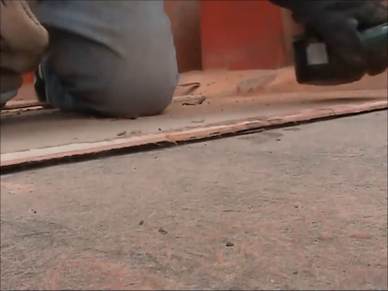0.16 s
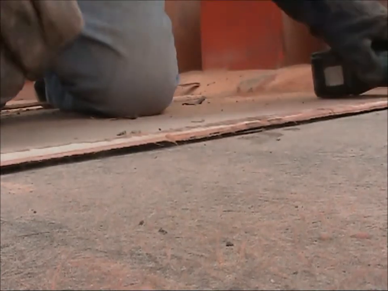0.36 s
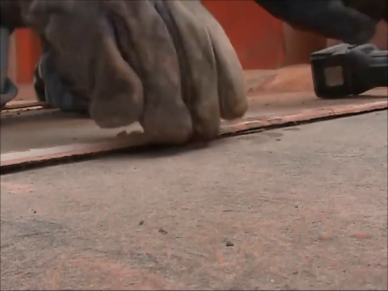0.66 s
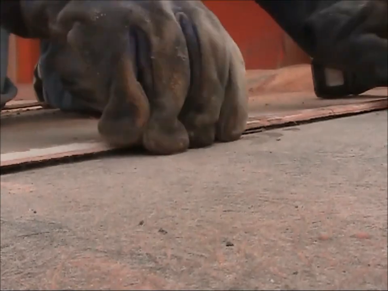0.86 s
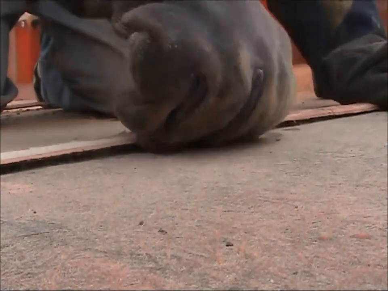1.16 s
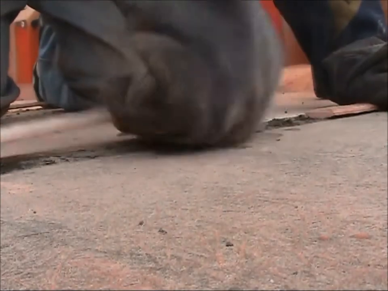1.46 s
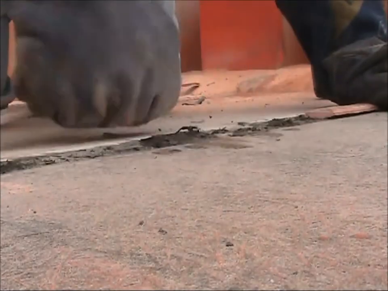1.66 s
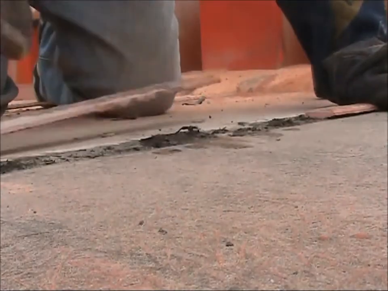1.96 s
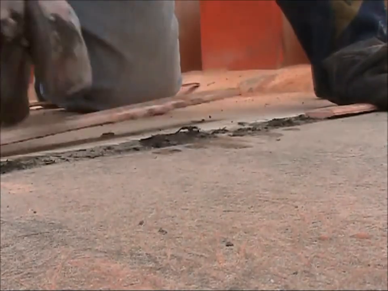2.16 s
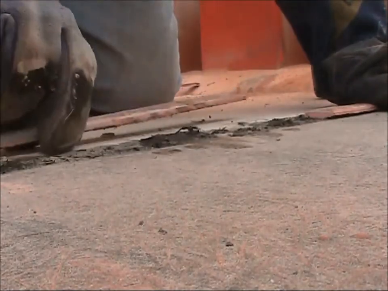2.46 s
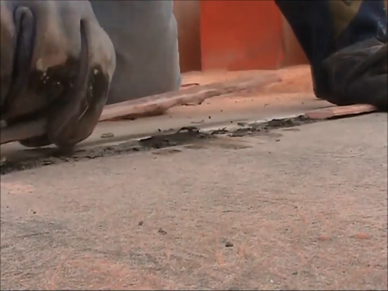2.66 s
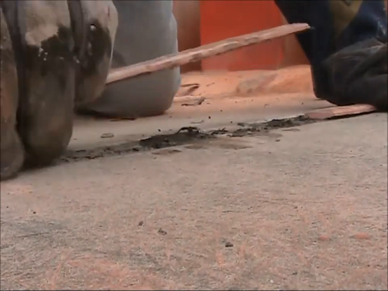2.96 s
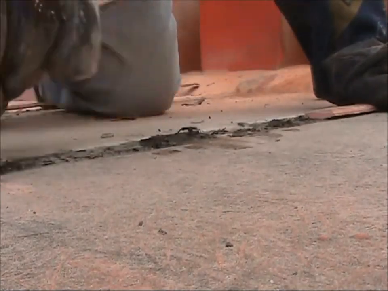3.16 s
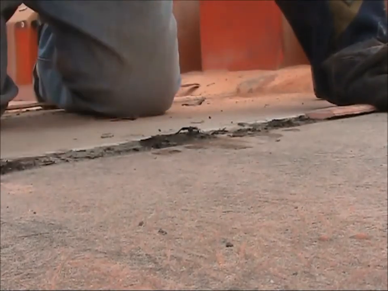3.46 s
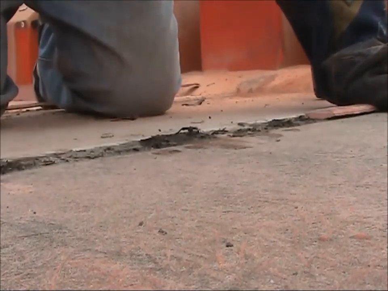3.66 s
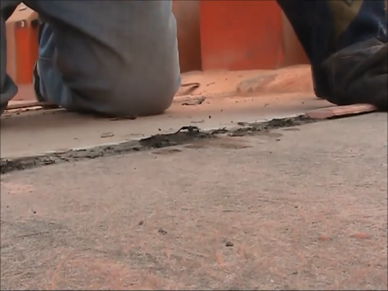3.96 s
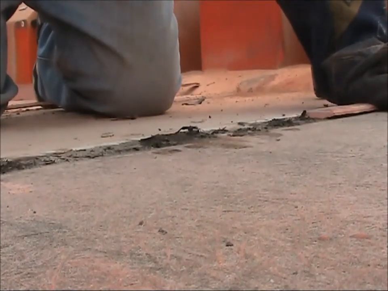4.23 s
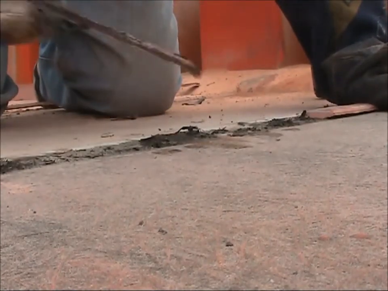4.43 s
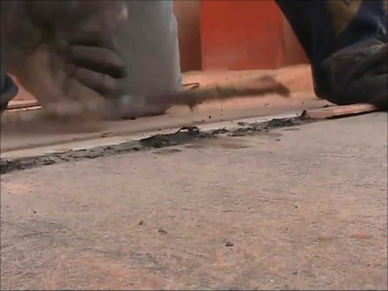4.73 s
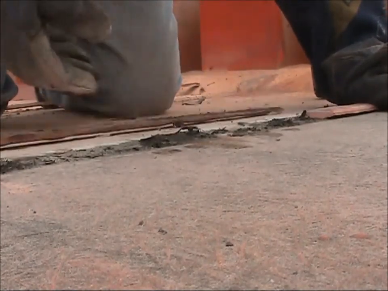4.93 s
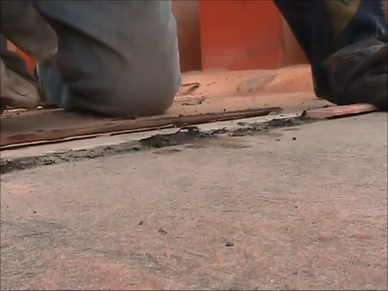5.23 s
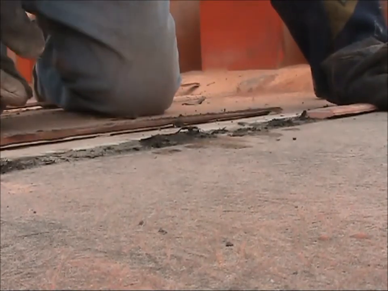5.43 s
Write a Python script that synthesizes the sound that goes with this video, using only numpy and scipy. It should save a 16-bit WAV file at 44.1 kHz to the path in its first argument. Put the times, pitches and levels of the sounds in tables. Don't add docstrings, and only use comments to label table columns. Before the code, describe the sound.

Close boat-deck work outdoors: heavy tool thump, sharp crack of a strip prised free, gritty scraping rattle, then a hard double drop.

```python
import sys
import numpy as np
from scipy import signal
from scipy.fft import rfft, irfft, next_fast_len
from scipy.io import wavfile
from scipy.ndimage import uniform_filter1d

SR = 44100
rng = np.random.default_rng(int(sys.argv[2]) if len(sys.argv) > 2 else 0)


def output_pcm(signal):
    pcm = np.clip(np.atleast_2d(signal).T, -1, 1) * 32767
    wavfile.write(sys.argv[1], SR, np.round(pcm).astype(np.int16))


def gain_from_decibels(decibels):
    exponent = np.asarray(decibels, float) / 20
    return 10 ** exponent


N = 246519
PAD = SR // 4

# pitch in Hz, width in Hz, level in dB.
STRIP_MODES = [(930, 290, -47), (1236, 123, 3.5), (1670, 400, -6), (2115, 310, 2.5), (3360, 640, -9.5),
               (4110, 130, 1), (5600, 2250, -7), (6930, 1660, 3.5), (9320, 1070, 0)]


def unit(x):
    return x / np.sqrt(np.mean(x ** 2) + 1e-20)


def along(points, hz):
    f, v = np.transpose(points)
    return np.interp(np.log(hz + 1), np.log(f + 1), v)


def curves(rows):
    s, *columns = np.transpose(rows)
    return [np.interp(np.arange(N) / SR, s, column) for column in columns]


def filtered(x, response):
    size = 2 * next_fast_len((x.shape[-1] + PAD) // 2)
    spectrum = rfft(x, size) * response(np.fft.rfftfreq(size, 1 / SR))
    return irfft(spectrum, size)[..., :x.shape[-1]]


def modes(table, f):
    total = 0
    for k, (centre, width, db) in enumerate(table):
        resonance = 1j * f * width / (centre * centre - f * f + 1j * f * width)
        total = total + (-1) ** k * gain_from_decibels(db) * resonance
    return total


def band(x, lo_hz, hi_hz):
    sos = signal.butter(3, [lo_hz, min(hi_hz, SR * 0.48)], "bandpass", fs=SR, output="sos")
    return signal.sosfilt(sos, x)


def add(track, sound, s):
    track[round(s * SR):][:len(sound)] += sound


def contacts():
    # start in seconds, level in dB,
    # hardness (0 clack, 1 crack, 2 tick), time to fade by 60 dB in seconds.
    tool_taps = [
        (0.3648, 0, 0.086, 0.013),
        (0.3673, 6.5, 0, 0.0046),
        (0.3725, -9, 0.89, 0.092),
        (0.381, -14, 0.057, 0.21),
        (0.394, -18, 0, .005),
        (0.4235, -13.5, 0.37, 0.16),
        (0.433, -7, 0.2, 0.02),
        (0.437, -10.5, 1, 0.018),
        (0.4452, -22, 1, .017),
        (0.4569, -26.5, 0.88, 0.094),
    ]
    handling = [(0.7257, -27, 0, 0.0094), (0.74, -17, 0.34, 0.015), (0.807, -28.5, 0.018, 0.11),
                (0.8165, -28, 1, 0.026), (0.9799, -18.5, 0.59, 0.18), (1.042, -21, 0.06, 0.0028),
                (1.053, -21, 0.61, 0.13), (1.07, -25, 1.55, 0.019), (1.136, -13, 0.57, 0.015),
                (1.2204, -23.5, 1, 0.002), (1.2742, -19, 0.6, 0.22), (1.278, -17, 1.55, 0.014),
                (2.3108, -26, 0.98, 0.0032), (2.4687, -13, 0.77, 0.01), (2.6657, -21.5, 1.36, .004),
                (2.676, -19, 1.4, 0.038), (2.75, -29, 1, 0.013), (2.819, -12, 1.56, 0.028),
                (2.888, -17.5, 0.38, 0.054), (2.893, -20.5, 0.6, 0.0082), (2.8958, -17.5, 0.15, 0.011),
                (3.0757, -21, 0.14, 0.027), (3.12, -30, 1.7, .004), (3.131, -32, 1.4, .004),
                (3.139, -20, 1.46, 0.0045), (3.179, -33, 1, .006), (3.187, -19, 1.5, .005),
                (3.1928, -18.5, 0.39, 0.0097), (3.205, -11, 0.45, 0.016), (3.216, -14, 0.57, 0.016),
                (3.2286, -12, 0.32, 0.0027)]
    snap = [(1.465, 4.5, 0.54, 0.03), (1.4727, -5, 1.07, 0.052), (1.477, -4, 0.91, 0.0033),
            (1.4823, -2.5, 1.15, 0.018), (1.4841, -4, 1.3, .012), (1.4862, -9, 1.3, 0.0074),
            (1.5066, -18, 0.36, 0.066), (1.5177, 2, 1.45, 0.0026), (1.543, -23.5, 1.3, 0.18),
            (1.558, -22, 0.61, .006), (1.567, -20, 1.25, 0.056), (1.598, -28, 1.5, .005),
            (1.602, -27, 1.1, .006), (1.6136, -15, 1.06, 0.035), (1.655, -32, 1, 0.049),
            (1.667, -28.5, 0.99, 0.017)]
    rattle = [(3.3118, -17, 1.36, 0.025), (3.3197, -17.5, 0.71, 0.02), (3.332, -28, 1, 0.0043),
              (3.339, -25, 1, .005), (3.351, -17.5, 0.61, 0.02), (3.3568, -5, 0.69, 0.0017),
              (3.3758, -21.5, 0.55, 0.11), (3.382, -34, 1, .006), (3.3965, -12, 0.52, 0.024),
              (3.414, -22, 1.3, 0.093), (3.42, -20, 1.45, 0.02), (3.4264, -21, 2, .008),
              (3.4483, -15.5, 1.76, 0.089), (3.457, -6.5, 1.64, 0.021), (3.4743, -26.5, 1.43, 0.12),
              (3.482, -38, 1, .006), (3.5055, -24.5, 1.8, 0.085), (3.5088, -21, 1.5, 0.068),
              (3.513, -12, 1.65, 0.066), (3.5187, -3, 1.49, 0.03), (3.531, -11.5, 1.6, 0.034),
              (3.544, -15.5, 1.3, 0.038), (3.617, -25, 1.5, .008), (3.6257, -19, 1.7, 0.0079),
              (3.6418, -7, 1.5, 0.01), (3.649, -13.5, 2.5, 0.01), (3.655, -16.5, 1.3, 0.022),
              (3.6726, -12.5, 2.54, .016), (3.6805, -28, 1.5, .006), (3.692, -23, 1.7, .006),
              (3.7246, -19.5, 0.91, 0.014), (3.7442, -20, 0.57, 0.018), (3.769, -25, 1, .012),
              (3.7725, -12, 1.5, 0.0052), (3.7756, -1.5, 1.46, 0.015)]
    drops = [(3.8345, -33, 1.3, .004), (3.841, -30, 1.46, .004), (3.852, -37, 1, .006),
             (3.8945, -28.5, 1.2, .004), (3.91, -36, 1, .004), (3.9343, -18, 1.5, 0.014),
             (3.95, -31, 1.4, .006), (3.955, -18.5, 1.45, 0.054), (3.9828, -8, 1.5, 0.006),
             (3.986, 0.5, 1.45, 0.02), (3.9893, -11.5, 0.98, 0.0055), (3.9918, -3.5, 0.97, 0.0087),
             (4.7983, 8, 0.59, 0.038), (4.807, 7, 0.35, 0.014), (4.812, 7, 1.51, 0.024),
             (4.821, -5.5, 0.38, 0.0052), (4.879, -31, 0.16, 0.008), (4.9195, 3, 0.63, 0.0071),
             (4.925, -11, 0.16, 0.0049), (4.9291, -1.5, 0.58, 0.0039), (4.952, -35, 0, .005),
             (4.9596, -28, 0, 0.013), (4.968, -28, 0, .003), (4.972, -30, 0, 0.0032),
             (4.98, -9, 0.28, 0.019), (4.986, -21, 0.026, .01), (5.018, -19, 0.052, 0.0078)]
    narrow_dbs = [7.6, 26.1, 9.7, 13, 14.4]
    # pitch in Hz, width in Hz, level in dB.
    shell_modes = [(1020, 310, -5), (1320, 44, 1), (1870, 310, -6), (3900, 450, 6), (4550, 240, 4.5),
                   (5410, 130, 3), (8270, 420, 4.5)]

    t = np.arange(2600) / SR
    attack = 1 - np.exp(-t / 0.00028)
    fade_out = np.cos(np.pi / 2 * t / t[-1])
    bursts = np.zeros((2, 3, N + PAD))
    groups = [(0, tool_taps), (1, handling), (1, snap), (1, rattle), (1, drops)]
    for (body, table), narrow_db in zip(groups, narrow_dbs):
        for s, db, hard, t60 in table:
            grit = rng.standard_normal(len(t))
            decay = gain_from_decibels(-60 * t / max(t60, 0.002)) + 0.043 * gain_from_decibels(-60 * t / 0.016)
            spiky = grit * np.abs(grit) / np.sqrt(3)
            blow = np.sign(grit[0]) * (np.arange(len(t)) == 22)
            burst = attack * decay * fade_out * spiky + 8 * blow
            for part in range(3):
                add(bursts[body, part], gain_from_decibels(db - narrow_db * abs(part - hard)) * burst, s)

    clack = gain_from_decibels(11.5) * band(bursts[:, 0], 650, 2430)
    crack = gain_from_decibels(11) * band(bursts[:, 1], 2500, 6250)
    tick = gain_from_decibels(8) * band(bursts[:, 2], 7000, 12500)
    shell_drive, strip_drive = clack + crack + tick
    shell = filtered(shell_drive, lambda f: 0.22 + modes(shell_modes, f))
    return shell + filtered(strip_drive, lambda f: 0.5 + modes(STRIP_MODES, f))


def deck():
    # start in seconds, level in dB, pitch in Hz, time to fade by 60 dB in seconds.
    prising = [(0.7229, -32, 820, 0.038), (0.7249, -29, 1123, 0.049), (0.7249, -25.5, 445.4, 0.093),
               (0.7249, -23, 671, 0.057), (0.7448, -20.5, 300, 0.045), (1.0391, -29, 895, 0.052),
               (1.0391, -23, 508, 0.051), (1.0401, -30, 1160, 0.025), (1.0401, -28, 720, 0.04),
               (1.0441, -22.5, 291, 0.1), (1.0461, -27.5, 760, 0.032), (1.0721, -32, 980, 0.051),
               (1.082, -33, 314, 0.092), (1.1349, -26.5, 224, 0.028), (1.2756, -31, 715, 0.053),
               (1.2766, -29.5, 287, 0.035), (1.2796, -31, 1150, 0.036), (1.6145, -15, 4900, 0.023),
               (1.2816, -20.5, 433, 0.029), (1.4642, 3, 1297, 0.029), (1.4652, -12, 560, 0.035),
               (1.4672, -22, 790, 0.054), (1.4682, -9, 302, 0.033), (1.4721, -18, 937, 0.058),
               (1.4781, -12, 453, 0.044), (1.4861, -12, 550, 0.042), (1.5121, -26, 1100, 0.032),
               (1.5161, -14, 577, 0.026), (1.5171, -23, 1320, 0.036), (1.539, -32, 1350, 0.052),
               (1.541, -25, 550, 0.043), (1.6178, -33, 320, 0.1), (1.9431, -30, 426, 0.12),
               (2.8859, -28.5, 973, 0.073), (2.459, -29.5, 2506, 0.053), (2.8909, -26, 1145, 0.043),
               (2.8939, -25, 408, 0.026), (2.8949, -32, 1420, 0.035)]
    bumps = [(.3635, -13, 824, 0.093), (.568, -24, 134.6, 0.087), (1.525, -29, 504, 0.043),
             (1.569, -26.5, 607, 0.027), (1.578, -32.5, 390, 0.091), (.376, -6.5, 134, 0.096),
             (2.085, -28.5, 440, 0.03), (2.32, -34, 450, 0.033), (2.338, -34, 240, 0.029),
             (2.469, -32.5, 296, 0.037), (3.324, -31.5, 400, 0.044), (.545, -23.5, 383, 0.067),
             (3.65, -30, 288, .05), (.427, -10.5, 247, 0.059), (4.8, -21, 69.6, 0.057),
             (4.81, -11, 294, 0.05), (4.825, -17.5, 322, 0.057), (4.941, -27, 393, 0.055)]
    dragging = [(3.0736, -27, 1180, 0.035), (3.0745, -28, 1020, 0.035), (3.2052, -30.5, 700, 0.066),
                (3.2064, -20.5, 393, 0.021), (3.2272, -16, 447, 0.02), (3.311, -27, 670, 0.041),
                (3.357, -11, 3220, 0.016), (3.3559, -32, 870, 0.076), (3.5195, -15, 3430, 0.023),
                (3.3565, -31.5, 318, 0.091), (3.3599, -22.5, 580, 0.034), (3.3975, -16, 3500, 0.012),
                (3.458, -22, 3270, 0.018), (3.3968, -28, 330, 0.081), (3.3978, -39, 870, 0.032),
                (3.4287, -30.5, 435, 0.16), (3.436, -36, 380, 0.029), (3.4556, -13.5, 450, 0.027),
                (3.4683, -28, 408, 0.076), (3.511, -35, 1174, 0.052), (3.5135, -37, 1260, 0.034),
                (3.5145, -35, 1420, 0.043), (3.5145, -23, 560, 0.11), (3.5157, -32, 373, 0.13),
                (3.5305, -19.5, 664, 0.03), (3.5301, -21, 365, 0.054), (3.5477, -30, 325, 0.048),
                (3.6313, -29, 596, 0.039), (3.721, -30, 1220, 0.032), (3.725, -29, 430, 0.047),
                (3.373, -24, 2400, 0.03), (3.742, -23, 1270, 0.026), (3.745, -22.5, 925, 0.04),
                (3.745, -32.5, 225, 0.1), (3.745, -18.5, 424, 0.019), (3.746, -28.4, 660, 0.018),
                (3.7719, -23.5, 670, 0.023), (3.7749, -33, 1370, 0.033)]
    dropping = [(3.9844, -22, 607, 0.061), (3.9855, -26, 980, 0.085), (3.9854, -12, 361, 0.041),
                (3.9874, -12, 1425, 0.029), (3.9954, -38, 598, 0.11), (3.9954, -23, 409, 0.06),
                (4.7983, -4.5, 1000, 0.036), (4.7985, -2, 403, 0.036), (4.7996, -10, 615, 0.092),
                (4.8006, -29, 840, 0.032), (4.8084, -7, 1320, 0.031), (4.8145, -23, 850, 0.032),
                (4.8, -14, 3600, 0.035), (4.8774, -32, 930, 0.04), (4.8795, -22.5, 664, 0.027),
                (4.8795, -25, 442, 0.065), (4.8814, -31, 287, 0.043), (4.9109, -27.5, 220, 0.051),
                (4.9206, -26, 1145, 0.06), (4.9195, -20, 912, 0.063), (4.9204, -14, 655, 0.041),
                (4.9222, -14.5, 443, 0.04), (4.9243, -30.5, 272.6, 0.13), (4.9283, -30, 1370, 0.051),
                (4.9197, -9, 2900, 0.025), (4.9205, -8, 3800, 0.021), (4.9608, -26.5, 450, 0.044),
                (4.9652, -27, 686, 0.032), (4.979, -18, 3080, 0.028), (4.9777, -28, 1020, 0.07),
                (4.7988, -7, 2920, 0.04), (4.982, -28.5, 290, 0.056), (4.983, -25, 427.5, 0.11),
                (4.801, -19.5, 143, 0.051), (5.0171, -31, 1420, 0.038), (5.0181, -39, 690, 0.047),
                (5.0191, -27.5, 447, 0.038)]

    t = np.arange(6000) / SR
    rise_s, puff_share = 0.001, 0.25
    out = np.zeros(N + PAD)
    for knocks in [prising, bumps, dragging, dropping]:
        for s, db, hz, t60 in knocks:
            fade = (1 - np.exp(-t / rise_s)) * gain_from_decibels(-60 * t / max(t60, 0.01))
            puff = unit(band(rng.standard_normal(len(t)), hz * 0.64, hz * 1.8))
            ring = np.sin(2 * np.pi * hz * t) + puff_share * puff
            add(out, gain_from_decibels(db + 4.0) * fade * ring, s)
    return out


def tool():
    # start in seconds, level in dB, softness in ms.
    thuds = [
        (0.3637, 13.5, 0.22),
        (.369, 10.5, 0.43),
        (.425, 4, 0.62),
        (.437, -6, 0.56),
        (0.482, -11, 2.8),
        (0.507, -12, 3.5),
        (0.538, 1, 5.2),
        (0.548, 0.5, 3.9),
        (0.572, -2, 2.65),
        (0.601, -38, 3.2),
    ]
    # time in seconds, level in dB.
    rocking = [
        (.36, -54),
        (.367, -14),
        (.43, -6),
        (.46, -19),
        (.51, -35),
        (.555, -22),
        (.595, -29.5),
        (.64, -38.5),
        (.70, -44),
    ]
    # pitch in Hz, width in Hz, level in dB.
    panel_modes = [(124.4, 30.5, 2.5), (206, 46, 4), (286, 38, 10.5), (403.6, 47, 4), (516, 51, 1),
                   (654, 68, 1), (735, 26, 3), (820, 90, 4.5)]

    push = np.zeros(N + PAD)
    t = np.arange(900) / SR
    for s, db, soft_ms in thuds:
        u = t / (soft_ms * 0.00028)
        bump = u ** 2 * np.exp(-u)
        add(push, gain_from_decibels(db + 30.5) * bump / np.sum(bump), s)
    shudder = unit(band(rng.standard_normal(N), 95, 465))
    push[:N] += gain_from_decibels(curves(rocking)[0] - 10.0) * shudder
    return filtered(push, lambda f: modes(panel_modes, f))


def rubbing():
    # start in seconds, end in seconds, level in dB,
    # centre in Hz, reach in octaves to each side.
    scrapes = [(0.522, 0.599, -37.5, 3300, 1.2), (0.786, 0.834, -33.5, 3350, 1.36),
               (0.953, 1.17, -37.5, 2630, 1.4), (1.269, 1.305, -30.5, 2500, 0.66),
               (1.459, 1.509, -20, 3380, 1.56), (1.483, 1.685, -35, 3750, 0.97),
               (1.563, 1.575, -19.5, 5300, 0.38), (1.766, 1.771, -36, 4300, 0.85),
               (2.144, 2.171, -39.5, 3770, 1.15), (2.442, 2.474, -33, 3300, 1.3),
               (2.655, 2.732, -41, 4650, 0.92), (2.722, 2.835, -37, 5400, 1.0),
               (2.742, 2.82, -35.5, 2800, 0.33), (2.984, 3.051, -38.5, 3750, 1.14),
               (3.064, 3.096, -37.5, 1490, 2.74), (3.408, 3.46, -32.5, 7160, 0.58),
               (3.502, 3.584, -34, 6360, 0.64), (3.61, 3.69, -29.5, 5230, 1.1),
               (3.702, 3.769, -31, 4200, 1.3), (3.768, 3.788, -25, 4140, 1.62),
               (3.974, 4.006, -22, 3500, 1.25), (4.804, 4.836, -23.5, 2500, 0.95),
               (4.921, 4.937, -17, 2900, 0.53)]

    out = np.zeros(N + PAD)
    for start, end, db, hz, octaves in scrapes:
        n = max(round((end - start) * SR), 200)
        grains = gain_from_decibels(4 * unit(uniform_filter1d(rng.standard_normal(9000), 40)))[:n]
        rasp = unit(band(rng.standard_normal(9000), hz / 2 ** octaves, hz * 2 ** octaves))[:n]
        stroke = np.sin(np.pi * np.linspace(0, 1, len(rasp))) ** 0.47
        add(out, gain_from_decibels(db) * stroke * grains * rasp, start)
    return filtered(out, lambda f: 1.1 + 0.051 * modes(STRIP_MODES, f))


def near_tone(x):
    # pitch in Hz, gain in dB.
    tone = [(35, -1.5), (120, 5.5), (9300, -10), (10500, -10.5), (12500, -15), (14500, 2), (15500, 0),
            (16300, -18)]

    def response(f):
        cepstrum = irfft(np.log(gain_from_decibels(along(tone, f))))
        half = len(cepstrum) // 2
        cepstrum[1:half] *= 2
        cepstrum[half + 1:] = 0
        return np.exp(rfft(cepstrum))

    return filtered(x, response)


def ports(x):
    # pitch in Hz, time to fade by 60 dB in seconds.
    echo = [(200, 0.14), (1500, 0.055), (8000, 0.043)]
    # time in seconds, bearing from -1 right to 1 left.
    bearing = [(0, -1.2), (.65, -0.12), (.7, 0.018), (1.35, 0.041), (1.45, 0.5), (2.2, 0.64), (3.1, 0.17),
               (3.3, 0.57), (4.1, 0.53), (4.7, 0.47), (5.59, -0.84)]
    # pitch in Hz, share in phase.
    louder_left = [(300, 0.022), (700, 0.033), (1400, 0.39), (3000, 0.6), (6000, 0.29), (11000, 0)]
    # pitch in Hz, share a quarter cycle ahead.
    leads_left = [(300, 0.14), (700, 0.047), (1400, 0.64), (3000, 0.16), (6000, 0.94), (9000, 1.7),
                  (12500, 8.2), (15000, 1.8)]
    # pitch in Hz, share a quarter cycle ahead.
    mismatch = [(60, -0.57), (140, -0.27), (350, -0.17), (800, 0.026)]

    hz, t, z = signal.stft(rng.standard_normal((2, SR // 4)), SR, nperseg=256)
    tail = signal.istft(z * gain_from_decibels(-60 * t / along(echo, hz)[:, None]), SR, nperseg=256)[1]
    tail = tail / np.linalg.norm(tail[0])
    mid_echo, side_echo = signal.fftconvolve(x[None], tail, axes=1)[:, :N]
    mid = x + gain_from_decibels(-10.0) * mid_echo
    from_left = filtered(x, lambda f: along(louder_left, f) + 1j * along(leads_left, f))
    side = 0.93 * curves(bearing)[0] * from_left
    side = side + filtered(mid, lambda f: 0.043 + 1j * along(mismatch, f))
    side = side + gain_from_decibels(-1.5) * filtered(side_echo, lambda f: 1j * f / (4000 + 1j * f))
    return np.array([mid + side, mid - side])


def ducking(x):
    hop = 64
    loud = np.abs(uniform_filter1d(np.mean(x ** 2, 0), 220)) ** 0.5
    over_db = np.clip(20 * np.log10(loud[::hop] + 1e-9) + 21, 0, 20)
    fall = np.arange(len(over_db)) * hop / SR * 45
    held_db = np.clip(np.maximum.accumulate(over_db + fall) - fall, 0, 99)
    return gain_from_decibels(-0.31 * np.interp(np.arange(N), np.arange(len(held_db)) * hop, held_db))


def rush(spectrum, patchy_db):
    # pitch in Hz, likeness from -1 to 1.
    alike = [(60, 0.51), (130, 0.51), (290, 0.8), (1410, 0.75), (3100, 0.52), (7500, 0.32), (10500, -0.32),
             (13500, -0.33)]

    z = signal.stft(rng.standard_normal((2, N)), nperseg=512)[2]
    field = uniform_filter1d(rng.standard_normal(z.shape[1:]), 5, 0)
    field = uniform_filter1d(field, 12, 1)
    pair = signal.istft(z * gain_from_decibels(patchy_db * unit(field)), nperseg=512)[1][:, :N]

    def spread(hz):
        angle = np.arccos(np.clip(along(alike, hz), -1, 1)) / 2
        return gain_from_decibels(along(spectrum, hz)) * [np.cos(angle), np.sin(angle)]

    mid, side = filtered(pair, spread)
    return unit(np.array([mid + side, mid - side]))


def bird_call():
    # time in seconds, pitch in Hz, level in dB.
    call = [
        (4.685, 4200, -67),
        (4.697, 4240, -50),
        (4.71, 4350, -40),
        (4.72, 4540, -39),
        (4.742, 4620, -40),
        (4.752, 4650, -64),
        (4.772, 4300, -48),
        (4.785, 4400, -37),
        (4.81, 4500, -72),
    ]

    hz, bird_db = curves(call)
    blur = 0.46 + unit(band(rng.standard_normal(N), 36, 200))
    whistle = np.sin(2 * np.pi * np.cumsum(hz) / SR)
    return gain_from_decibels(bird_db - 3) * blur * whistle * (bird_db > -69)


def yard():
    # time in seconds, level in dB.
    yard_level = [
        (0, -42.5),
        (.9, -39),
        (1.4, -40.5),
        (1.8, -42),
        (2.6, -42.5),
        (3.2, -43),
        (3.6, -38.5),
        (4.0, -43.5),
        (5.59, -41.5),
    ]
    # pitch in Hz, level in dB per Hz.
    rumble = [(22, -21), (53, -10.5), (173, -2.5), (320, -11), (410, -1.5), (524, -6.5), (1440, -15.5),
              (3960, -52)]
    # pitch in Hz, level in dB per Hz.
    hiss = [(600, -69), (950, -1), (1630, -3.5), (4800, -8), (8500, -16.5), (12600, -26), (15000, -24),
            (16100, -52)]

    yard_db, = curves(yard_level)
    low = gain_from_decibels(yard_db - 0.95) * rush(rumble, patchy_db=1.15)
    high = gain_from_decibels(yard_db - 2.5) * rush(hiss, patchy_db=1.3)
    return low + high + bird_call()


def scene():
    work = contacts() + deck() + tool() + rubbing()
    near = ports(near_tone(work[:N]))
    return near + ducking(near) * yard()


def band_limit(x):
    return signal.sosfilt(signal.butter(12, 16390, fs=SR, output="sos"), x)


def record(dry):
    clipped = dry / (1 + np.abs(dry) ** 12) ** (1 / 12)
    return band_limit(clipped)


dry = scene()
out = record(dry)
output_pcm(out)
```